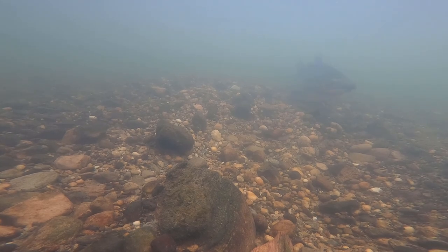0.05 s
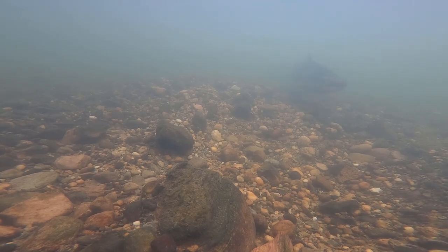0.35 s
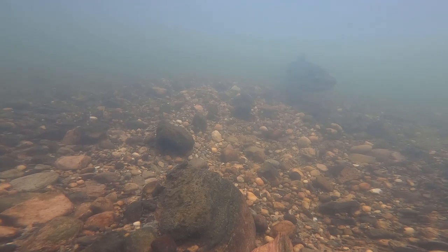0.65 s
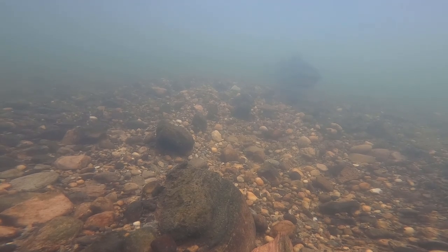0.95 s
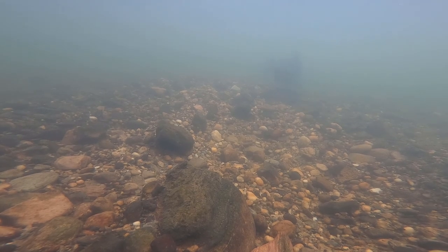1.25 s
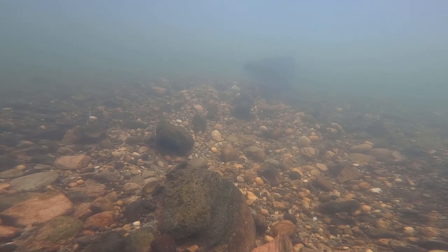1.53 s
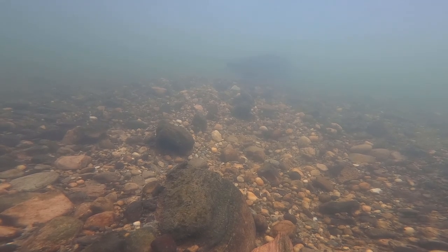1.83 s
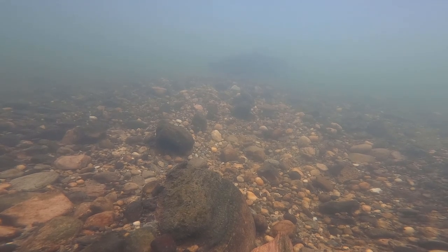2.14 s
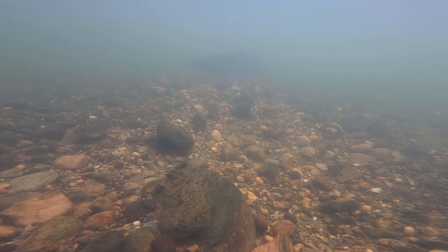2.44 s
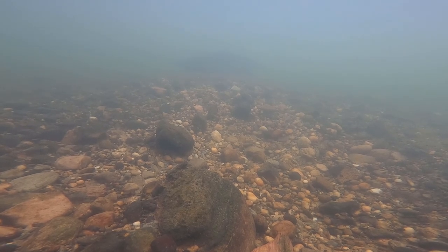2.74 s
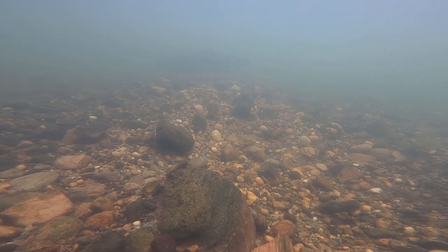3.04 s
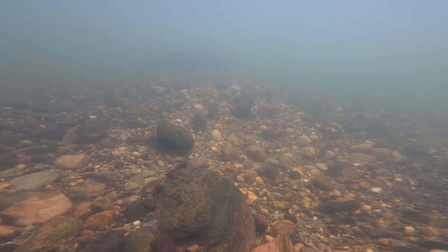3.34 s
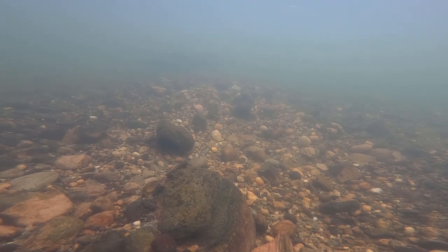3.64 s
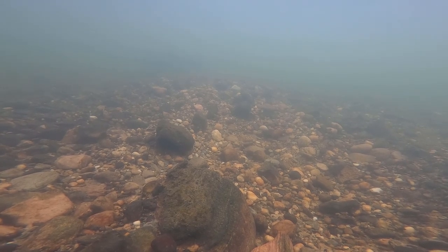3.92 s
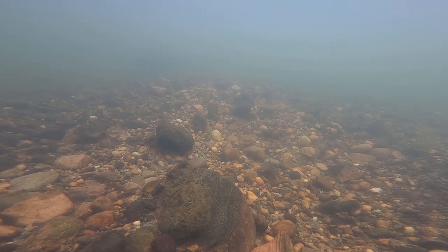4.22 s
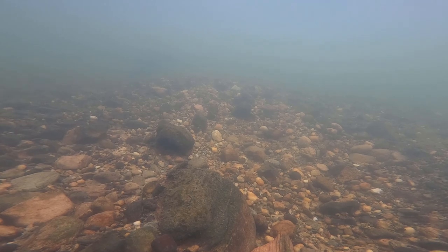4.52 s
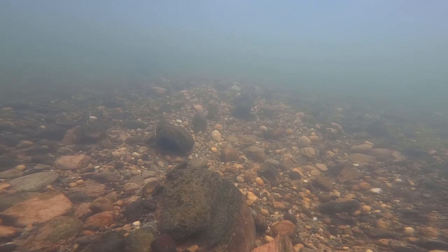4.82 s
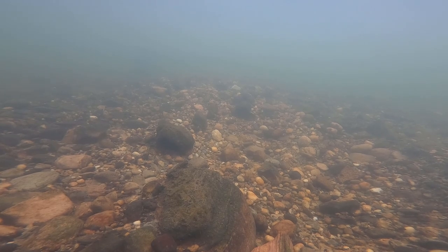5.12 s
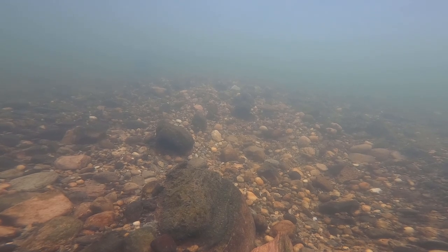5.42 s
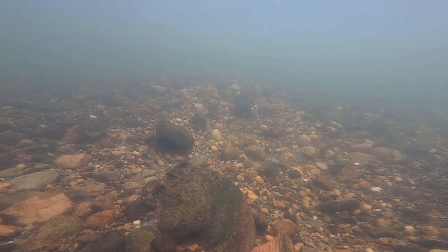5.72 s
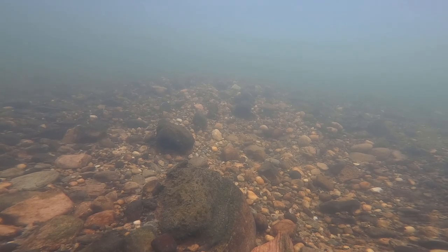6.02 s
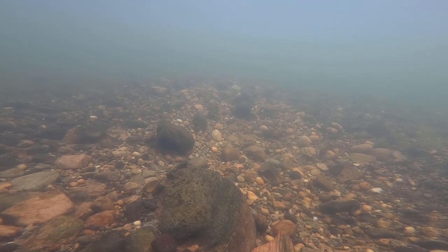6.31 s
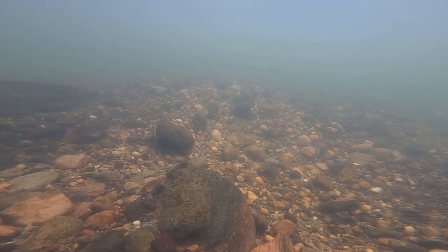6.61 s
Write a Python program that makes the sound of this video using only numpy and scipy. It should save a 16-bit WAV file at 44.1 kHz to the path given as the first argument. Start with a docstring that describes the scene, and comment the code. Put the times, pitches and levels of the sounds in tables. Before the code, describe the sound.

Flowing water buffets a submerged microphone with a deep, wavering rumble, while bubbles gurgle, soft knocks thud and small stones tick.

```python
"""A river current buffets a waterproof camera on its gravel bed: the fluctuating pressure of the eddies
makes a deep rumble. Clouds of bubbles, each an oscillator whose pitch falls with size, churn and gurgle
in the flow, and sand hisses faintly in the stronger surges. Impacts excite damped vibrations: dull knocks
on the housing and ticks of nearby pebbles. Gravel shifts briefly, and there are faint, brief bursts of
high, scratchy crackle and one sharp click."""
import sys
import numpy as np
from scipy import signal
from scipy.fft import rfft, irfft
from scipy.io import wavfile
from scipy.ndimage import uniform_filter1d

SR = 44100
rng = np.random.default_rng(int(sys.argv[2]) if len(sys.argv) > 2 else 0)


def generate_wav(sig):
    """Save sig (samples, or channels by samples) to the path in sys.argv[1] as 16-bit PCM at SR."""
    pcm = np.round(np.clip(np.atleast_2d(sig).T, -1, 1) * 32767).astype(np.int16)
    wavfile.write(sys.argv[1], SR, pcm)


N = 298116
T = np.arange(N) / SR

# Spectral shapes of the noisy sounds. Each row: frequency in Hz, relative gain in dB.
SAND_SPECTRUM = [(800, 1.5), (2000, -5), (3500, -9), (6000, -15.5), (8000, -21), (15000, -28.5)]
CRACKLE_SPECTRUM = [(1500, 2.5), (3000, -5.5), (4500, -11.5), (6300, -13.5), (7500, -18.5), (15000, -27)]
GRAVEL_SPECTRUM = [(1300, -12.5), (1700, -1), (2150, 0.5), (3100, -8.5), (3900, -16), (6300, -20.5),
                   (7500, -36.5)]
SCUFF_SPECTRUM = [(1000, -2.5), (1500, 3), (2200, -2.5), (2900, -15), (3500, -27), (4500, -34), (8000, -42)]
FIZZ_SPECTRUM = [(900, -5.5), (1450, -1.5), (1800, -4.5), (2150, -1.5), (2500, -7), (2900, -5.5),
                 (3500, -16), (5000, -31)]
GURGLE_SPECTRUM = [(380, -3.5), (510, 1.5), (640, -3.5), (760, -0.5), (850, -2.5), (1000, -4.5),
                   (1200, -17.5), (1600, -35)]
CHURN_SPECTRUM = [(110, -14.5), (190, -5), (260, 0), (330, -0.5), (420, -3), (500, -10), (620, -36),
                  (900, -54)]
FLUTTER_SPECTRUM = [(55, -10), (80, 0.5), (102, 0.5), (150, -6.5), (220, -23), (400, -30.5)]
HEAVE_SPECTRUM = [(6, -8.5), (14, -3.5), (30, 4.5), (50, -1.5), (68, -3.5), (85, -15), (120, -34.5)]

# Faint, brief bursts of high, scratchy crackle. Each row: crest time and length in seconds, level in dB.
CRACKLE_BURSTS = [(.047, 0.022, -71), (.245, .07, -76), (.49, 0.019, -78.5), (.825, .02, -78),
                  (.9, 0.029, -79.5), (1.045, 0.077, -80), (1.478, 0.02, -71), (1.56, 0.046, -75.5),
                  (1.715, 0.047, -70), (2.165, 0.053, -73.5), (2.33, 0.019, -72), (2.39, 0.022, -71),
                  (2.56, 0.33, -80), (2.825, 0.025, -74.5), (2.92, 0.029, -78.5), (3.015, 0.021, -74.5),
                  (3.1, 0.023, -77), (3.21, 0.052, -76.5), (3.365, 0.031, -77.5), (3.6, .04, -77),
                  (3.89, 0.053, -75), (4.011, 0.025, -68), (4.125, 0.1, -74.5), (4.295, .025, -72.5),
                  (4.525, 0.031, -77), (4.685, 0.082, -75), (4.787, 0.025, -74.5), (5.0, 0.02, -74),
                  (5.085, 0.06, -72.5), (5.17, 0.035, -75), (5.49, 0.12, -70.5), (5.973, 0.033, -73.5),
                  (6.058, .025, -76), (6.355, 0.02, -76), (6.483, 0.021, -70.5), (6.565, 0.055, -72.5)]
# Patches of gravel shifting. Each row: crest time in seconds, length in seconds, level in dB.
GRAVEL_SLIPS = [(1.795, 0.06, -65), (2.086, 0.026, -63), (1.93, 0.46, -75.5)]
# Pebbles touching. Each row: start in seconds, peak level in dB, pitch in Hz.
PEBBLE_CLACKS = [(1.612, -61, 2150), (1.665, -50.5, 2270), (1.71, -63, 2400), (1.725, -59, 2490),
                 (1.752, -52, 2050), (1.7608, -38, 2180), (1.766, -51, 2700), (1.778, -51, 2590),
                 (1.798, -53, 2230), (1.816, -48, 2160), (1.829, -60, 2200), (1.925, -57, 2090),
                 (1.967, -60.5, 2000), (2.029, -50, 2210), (2.037, -57, 2300), (2.0811, -38.5, 2150),
                 (2.122, -59, 2250), (2.181, -60, 2210), (4.274, -57.5, 2160)]
# Modes of a pebble. Each row: frequency as a multiple of the pitch, relative level in dB.
PEBBLE_PARTIALS = [(.86, 4), (1, -1), (1.24, -3), (1.4, -12), (1.75, -26.5), (2.3, -23), (2.85, -23.5)]
# Dull knocks. Each row: start in seconds, peak level in dB, frequency in Hz, rise time in seconds.
DULL_KNOCKS = [(1.287, -24, 365, 0.003), (1.469, -20, 75, 0.0075), (1.698, -16, 70, .012),
               (2.322, -17, 89.8, 0.012), (2.863, -11, 84.5, 0.0092), (2.867, -27, 233, 0.0041),
               (2.889, -17.5, 125, 0.0064), (2.906, -12.5, 113, 0.0078), (3.964, -18, 282, 0.006),
               (4.003, -11, 80, 0.0098), (4.035, -16, 70.7, .008), (5.066, -25.5, 375, 0.0041),
               (5.071, -13, 88, 0.0068), (5.089, -23, 277, 0.0058), (5.36, -15, 83.7, 0.011),
               (5.421, -23, 352, 0.0025), (5.451, -13, 78.6, 0.0098), (5.761, -20.5, 263, 0.0044),
               (5.85, -16.5, 259, 0.0075), (5.965, -7.5, 232, 0.003), (6.109, -15.5, 260, 0.0052)]
# Modes of the hard knock. Each row: frequency in Hz, peak level in dB, lag and rise time in seconds.
HARD_KNOCK_PARTIALS = [(644, -21.5, 0.00095, 0.00265), (388, -6.5, 0.00085, 0.0043),
                       (205, -12.5, 0.0022, 0.0045)]
# Single clear bubbles. Each row: start in seconds, peak level in dB, pitch in Hz.
PLIPS = [(.473, -62, 1860), (.955, -61.5, 2130), (1.254, -38, 514), (1.28, -31.5, 503), (1.39, -26.5, 487),
         (1.405, -31, 545), (1.45, -36, 483), (1.535, -37.5, 487), (1.631, -36, 516), (1.854, -39, 757),
         (1.913, -59, 2130), (1.973, -35.5, 486), (2.184, -47.5, 490), (2.56, -46.5, 743),
         (2.594, -44, 571), (2.826, -62.5, 2280), (2.852, -64, 1840), (2.872, -37.5, 512),
         (2.95, -60, 1520), (3.071, -59, 1370), (3.106, -46.5, 770), (3.14, -63, 1950), (3.171, -63, 2120),
         (3.244, -55.5, 1480), (3.402, -42, 500), (4.199, -58.5, 2560), (4.2, -64, 2870),
         (4.579, -62, 1600), (4.853, -66, 1520), (5.16, -42, 580), (5.177, -57, 1370), (5.415, -44, 640),
         (5.481, -60, 1670), (5.592, -44.5, 540), (5.719, -45, 955), (5.72, -57.5, 1420),
         (5.776, -60.5, 1380), (5.87, -41.5, 524), (6.129, -38, 498)]
# Trickles of fine bubbles. Each row: crest time in seconds, length in seconds, level in dB.
FIZZ_TRICKLES = [(.25, 0.41, -74.5), (.97, 0.087, -79), (1.31, .08, -70), (2.33, 0.26, -74.5),
                 (2.87, 0.11, -71), (3.18, 0.26, -75), (3.6, 0.33, -74.5), (4.1, 0.42, -76),
                 (5.79, 0.14, -70)]
# Passing bubble clouds. Each row: crest time and length in seconds, churn and gurgle levels in dB.
BUBBLE_CLOUDS = [(.25, 0.56, -37.5, -56), (1.29, .04, -27, -43), (1.335, .035, -24, -46),
                 (1.415, 0.059, -30.5, -45.5), (1.52, .09, -38.5, -51), (2.1, 0.39, -45, -54.5),
                 (2.36, .14, -40, -50), (2.87, .12, -32, -48), (3.42, .1, -45, -56.5), (3.07, .1, -53, -57),
                 (3.57, 0.12, -38.5, -66.5), (3.83, .22, -35.5, -65), (3.97, .07, -32.5, -62),
                 (4.57, 0.076, -35.5, -49.5), (4.8, .09, -44, -51), (5.11, .1, -33.5, -52),
                 (5.455, 0.085, -37, -43), (5.93, .2, -24, -63.5), (6.0, .75, -30, -59.5),
                 (6.52, 0.09, -32, -47.5), (6.73, 0.11, -36, -61)]
# Eddies rocking the housing sideways. Each row: crest time and length in seconds, strength in dB.
SIDE_EDDIES = [(5.61, 0.071, -39.5), (5.985, 0.025, -25), (6.22, 0.17, -47)]
# The steady current between surges. Each row: time in seconds, relative strength in dB.
CURRENT = [(0.0, -30), (0.62, -32.5), (2.07, -28.5), (2.45, -30.5), (3.05, -27.5), (3.31, -31),
           (4.07, -24.5), (4.33, -39), (4.52, -31.5), (4.74, -29.5), (5.44, -30.5), (5.82, -31),
           (6.55, -24.5), (6.76, -30)]
# Surges on the housing. Each row: crest time and length in seconds, heave and flutter levels in dB.
CURRENT_SURGES = [(.11, 0.091, -24.5, -29.5), (.3, 0.081, -21.5, -49), (.7, 0.24, -39.5, -39.5),
                  (1.22, 0.14, -48, -34.5), (1.47, 0.11, -24, -30), (1.56, 0.04, -18.5, -37.5),
                  (1.74, .1, -20.5, -27), (2.0, 0.22, -21.5, -33), (2.13, .1, -22, -32),
                  (2.34, 0.054, -30.5, -28), (2.44, .08, -28, -44.5), (2.9, .1, -18.5, -27),
                  (3.15, 0.048, -29.5, -35.5), (3.63, .12, -23.5, -35), (3.88, .16, -22.5, -31),
                  (4.05, 0.07, -24, -28), (4.15, 0.074, -20.5, -26), (4.3, 0.038, -22, -45),
                  (4.72, 0.11, -18.5, -33.5), (4.86, .09, -22, -28), (5.13, 0.14, -20, -30.5),
                  (5.36, 0.067, -27, -31.5), (5.5, 0.1, -16.5, -25.5), (5.67, 0.072, -22.5, -28.5),
                  (5.99, .17, -28, -30.5), (6.22, .06, -22, -35.5), (6.43, 0.092, -22, -33.5),
                  (6.57, 0.082, -20, -25.5)]

HEAVE_DB, FLUTTER_DB, CHURN_DB, GURGLE_DB = -29, -43, -39.5, -56.5  # steady current at its mean strength
RUMBLE_FOLLOW, BUBBLE_FOLLOW = 0.99, 0.064  # dB per dB of steady current
SURGE_CHURN_DB, SURGE_GURGLE_DB = -19.5, -32  # bubbles shaken loose, relative to a surge's flutter
SAND_DB, SAND_RUMBLE_DB, SAND_GROWTH = -86.5, -23, 0.72  # sand level at this rumble level; dB per dB


def undb(db):
    """Amplitude grows tenfold for every 20 dB."""
    return 10 ** (np.asarray(db) / 20)


def unit(x):
    """Normalisation to rms 1."""
    return x / np.sqrt(np.mean(x ** 2))


def add(out, s, sound):
    """Superposition: a sound is added from s seconds on."""
    i = int(np.clip(s * SR, 0, N - 1))
    out[i:i + len(sound)] += sound[:N - i]


def together(*levels_db):
    """Incoherent sources add in power; levels in dB."""
    return 10 * np.log10(sum(10 ** (db / 10) for db in levels_db) + 1e-18)


def swells(table, edge_db, shape):
    """Power sum of events, each edge_db below its crest at its ends; one dB curve per level column."""
    rows = [np.array(crest_db)[:, None] - edge_db * np.abs(2 * (T - s) / max(length_s, .01)) ** shape
            for s, length_s, *crest_db in table]
    return together(*rows)


def colour(x, spectrum):
    """Filtering imposes a spectral shape, falling 30 dB per octave beyond its ends; rms 1."""
    hz, db = np.transpose(spectrum)
    octave = np.log2(np.maximum(np.arange(N // 2 + 1) * SR / N, 1))
    known = np.log2(hz)
    beyond = np.abs(octave - np.clip(octave, known[0], known[-1]))
    gain = undb(np.interp(octave, known, db) - 30 * beyond)
    return unit(irfft(rfft(x) * gain, N))


def local_power(x, seconds):
    """Short-time power is the running mean of the square."""
    size = max(int(seconds * SR), 2)
    return uniform_filter1d(uniform_filter1d(x ** 2, size), size) + 1e-9


def even(x, seconds):
    """Division by the running rms removes slow chance swells and keeps quick flutter."""
    return x / np.sqrt(local_power(x, seconds))


def wander(rate_hz):
    """Smoothed random steps give a slowly varying modulation; rms 1."""
    size = max(int(SR / rate_hz), 2)
    steps = np.repeat(rng.standard_normal(N)[:N // size + 1], size)
    return unit(uniform_filter1d(steps, size)[:N])


def sand_and_crackle(rumble, grain_db=3.5, impulses_per_s=1900, impulse_spread_db=2.5, spurt_db=1.5):
    """Friction of sand hisses with the rumble; random impulses make faint bursts of scratchy crackle."""
    push_db = 10 * np.log10(local_power(rumble, seconds=0.02))
    drift_db = SAND_DB + SAND_GROWTH * (push_db - SAND_RUMBLE_DB)
    hiss = rng.standard_normal(N) * undb(grain_db * wander(700))
    impulses = (rng.random(N) < impulses_per_s / SR) * np.sign(hiss)
    impulses *= undb(impulse_spread_db * rng.standard_normal(N))
    crackle = even(colour(impulses, CRACKLE_SPECTRUM), 0.018)
    spurts = unit(crackle * undb(spurt_db * wander(170)))
    burst_db = swells(CRACKLE_BURSTS, edge_db=7.5, shape=4.4)[0]
    return colour(hiss, SAND_SPECTRUM) * undb(drift_db) + spurts * undb(burst_db)


def gravel(jerk_db=2.5):
    """Friction: small stones grind past each other in quick uneven jerks."""
    crunch = rng.standard_normal(N) * undb(jerk_db * wander(160))
    slip_db = swells(GRAVEL_SLIPS, edge_db=1.5, shape=2.9)[0]
    return colour(crunch, GRAVEL_SPECTRUM) * undb(slip_db)


def struck_mode(hz, rise_s):
    """A mode builds up during contact and is damped by the water; its envelope peaks at 1 at rise_s."""
    t = T[:int(10 * rise_s * SR)]
    return (t / rise_s * np.exp(1 - t / rise_s)) ** 2 * np.sin(2 * np.pi * hz * t)


def pebbles(rise_s=0.0013, rebound_s=.0019, rebound_db=-1, scatter_db=-15.5, scatter_s=.009):
    """Impact and rebound excite inharmonic modes; scattering between bed and surface adds a tail."""
    out, t = np.zeros(N), T[:SR // 10]
    for s, db, hz in PEBBLE_CLACKS:
        for lag_s, touch_db in ((0, 0), (rebound_s, rebound_db)):
            detunes = 1 + 0.053 * rng.standard_normal(len(PEBBLE_PARTIALS))
            clack = sum(undb(mode_db) * struck_mode(hz * ratio * detune, rise_s)
                        for (ratio, mode_db), detune in zip(PEBBLE_PARTIALS, detunes))
            add(out, s + lag_s, undb(db + touch_db) * clack / np.abs(clack).max())
        echoes = rng.standard_normal(len(t)) * np.exp(-t / scatter_s)
        tail = signal.fftconvolve(clack, echoes)
        add(out, s, undb(db + scatter_db) * tail / np.abs(tail).max())
    return out


def click(start_s=5.553, peak_db=-10.5, relax_s=0.0015):
    """A sudden step with exponential relaxation has a broad spectrum: one sharp, dry click."""
    out = np.zeros(N)
    add(out, start_s, undb(peak_db) * np.exp(-T[:SR // 20] / relax_s))
    return out


def knocks(hard_knock_s=1.3293, scuff_length_s=.005, scuff_crest_db=-45):
    """Impacts on stones excite the housing's damped modes; the one hard knock scuffs, then thuds."""
    out = np.zeros(N)
    for s, db, hz, rise_s in DULL_KNOCKS:
        add(out, s, undb(db) * struck_mode(hz, rise_s))
    for hz, db, lag_s, rise_s in HARD_KNOCK_PARTIALS:
        add(out, hard_knock_s + lag_s, undb(db) * struck_mode(hz, rise_s))
    scuff = even(colour(rng.standard_normal(N), SCUFF_SPECTRUM), 0.0033)
    scuff_db = swells([(hard_knock_s, scuff_length_s, scuff_crest_db)], edge_db=8.5, shape=1.5)[0]
    return out + scuff * undb(scuff_db)


def bubble(hz, cycles, glide, neck=0.089):
    """A bubble is a damped oscillator: over its life it decays 60 dB and its pitch rises by `glide`."""
    age = T[:int(cycles / hz * SR)] * hz / cycles  # 0 to 1
    ring = np.sin(2 * np.pi * cycles * age * (1 + glide * age / 2)) * np.exp(-np.log(1000) * age)
    ring *= 1 - np.exp(-(age / neck) ** 2)  # pinch-off takes the share `neck` of its life
    return ring / np.abs(ring).max()


def plips(life_at_1khz_s=0.055, pitch_spread=.22, lag_s=.018, companion_db=-8):
    """Close bubbles resonate above the rest, large ones for longer; three weaker ones break off each."""
    out = np.zeros(N)
    for s, db, hz in PLIPS:
        cycles = life_at_1khz_s * np.sqrt(hz * 1000)
        add(out, s, undb(db) * bubble(hz, cycles, glide=0.03, neck=0.053))
        for pitch, when in rng.random((3, 2)):
            companion = bubble(hz * (1 + pitch_spread * (2 * pitch - 1)), cycles / 2, glide=.02)
            add(out, s + lag_s * when, undb(db + companion_db) * companion)
    return out


def bubble_cloud(low_hz, high_hz, cycles, spread_db, far_db, count):
    """Random superposition: near bubbles ring, a few of them loudly; countless far ones merge to noise."""
    near = np.zeros(N)
    for when, pitch, chance in rng.random((count, 3)):
        hz = low_hz * (high_hz / low_hz) ** pitch
        db = -spread_db * np.log(max(chance, .01))
        add(near, when * N / SR, undb(db) * bubble(hz, cycles, glide=0.031))
    far = colour(rng.standard_normal(N), [(low_hz, 0), (high_hz, -6 * np.log2(high_hz / low_hz))])
    return unit(near) + undb(far_db) * far


def bubbly_water(churn_db, gurgle_db):
    """Resonance rises as radius falls: large bubbles churn, middling ones gurgle, fine ones fizz."""
    churn = bubble_cloud(132.1, 619.0, cycles=12.1, spread_db=2.5, far_db=-2, count=3500)
    gurgle = bubble_cloud(430, 1400, cycles=32, spread_db=3.5, far_db=-0.5, count=3500)
    fizz = bubble_cloud(1100, 3400, cycles=64, spread_db=3.5, far_db=-2.0, count=4000)
    stirred_db = -76 + 0.41 * (gurgle_db - np.mean(gurgle_db))  # the fizz swells with the gurgle
    trickle_db = swells(FIZZ_TRICKLES, edge_db=3.5, shape=2.7)[0]
    fizz_db = together(stirred_db, trickle_db) + 0.83 * wander(15)
    return (even(colour(churn, CHURN_SPECTRUM), 0.098) * undb(churn_db)
            + even(colour(gurgle, GURGLE_SPECTRUM), 0.18) * undb(gurgle_db)
            + colour(fizz, FIZZ_SPECTRUM) * undb(fizz_db))


def buffeting(heave_db, flutter_db):
    """Turbulent pressure: large eddies heave against the housing and small ones flutter over it."""
    heave = even(colour(rng.standard_normal(N), HEAVE_SPECTRUM), 0.14)
    flutter = even(colour(rng.standard_normal(N), FLUTTER_SPECTRUM), 0.074)
    return heave * undb(heave_db) + flutter * undb(flutter_db)


def scene():
    """The flow drives rumble, bubbles and sand; one housing carries all, so the channels nearly agree."""
    flow_db = np.interp(T, *np.transpose(CURRENT))
    flow_db -= np.mean(flow_db)
    surge_heave_db, surge_flutter_db = swells(CURRENT_SURGES, edge_db=4.0, shape=1.8)
    cloud_churn_db, cloud_gurgle_db = swells(BUBBLE_CLOUDS, edge_db=4.5, shape=1.8)
    heave_db = together(HEAVE_DB + RUMBLE_FOLLOW * flow_db, surge_heave_db)
    flutter_db = together(FLUTTER_DB + RUMBLE_FOLLOW * flow_db, surge_flutter_db)
    stir_db = BUBBLE_FOLLOW * flow_db
    churn_db = together(CHURN_DB + stir_db, surge_flutter_db + SURGE_CHURN_DB, cloud_churn_db)
    gurgle_db = together(GURGLE_DB + stir_db, surge_flutter_db + SURGE_GURGLE_DB, cloud_gurgle_db)
    rumble = buffeting(heave_db, flutter_db)
    water = (rumble + bubbly_water(churn_db, gurgle_db)) * undb(wander(16))  # wavers by 1 dB rms
    mid = water + plips() + sand_and_crackle(rumble) + gravel() + knocks() + pebbles() + click()
    rocking_db = swells(SIDE_EDDIES, edge_db=6.0, shape=1.03)[0]
    side = buffeting(rocking_db - 0.5, rocking_db - 4.5) + undb(-14) * sand_and_crackle(rumble)
    return np.array([mid + side, mid - side])


def record(dry, top_hz=16000, fade_in_s=.005):
    """Self-noise and band limit: the camera adds faint hiss and cuts the top; the sound fades in."""
    hiss = undb(-96.5) * rng.standard_normal(N)
    fade = np.minimum(T / fade_in_s, 1)
    lowpass = signal.ellip(6, .1, 50, top_hz, fs=SR, output="sos")
    return signal.sosfiltfilt(lowpass, (dry + hiss) * fade)


dry = scene()
out = record(dry)
generate_wav(out)
```